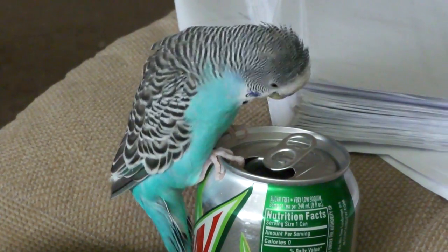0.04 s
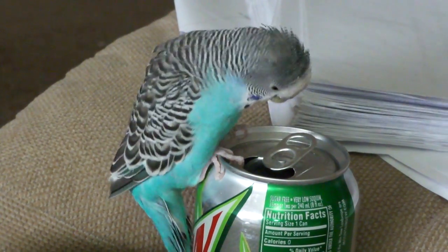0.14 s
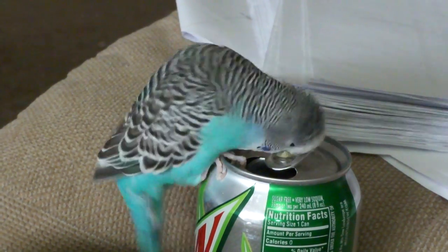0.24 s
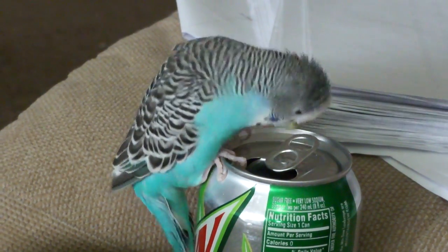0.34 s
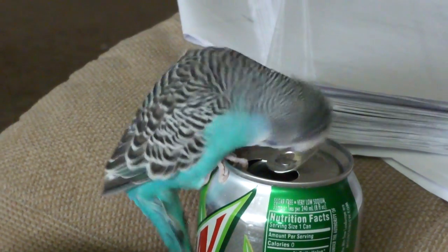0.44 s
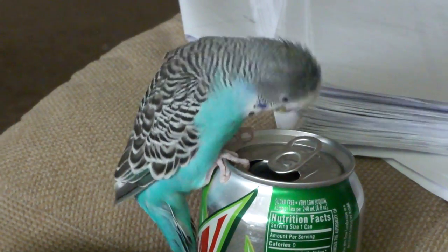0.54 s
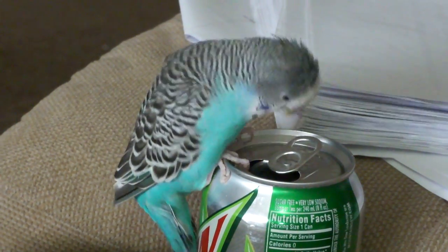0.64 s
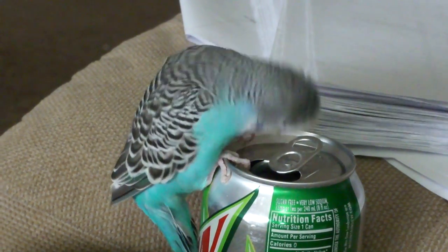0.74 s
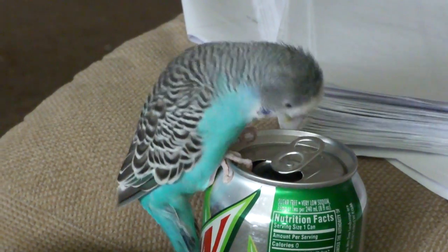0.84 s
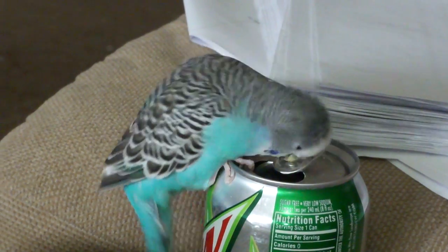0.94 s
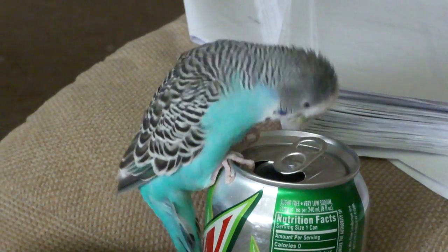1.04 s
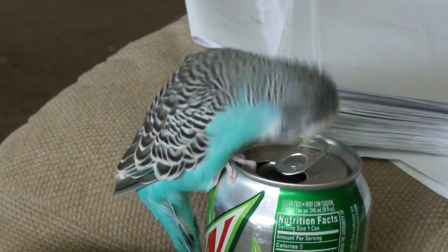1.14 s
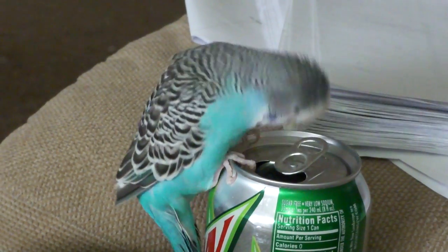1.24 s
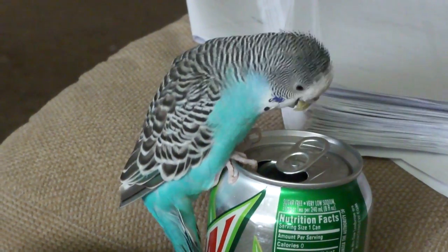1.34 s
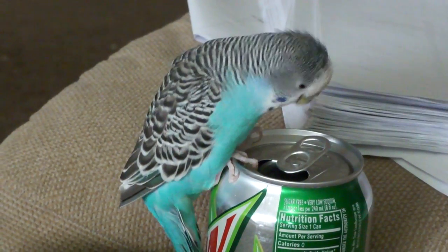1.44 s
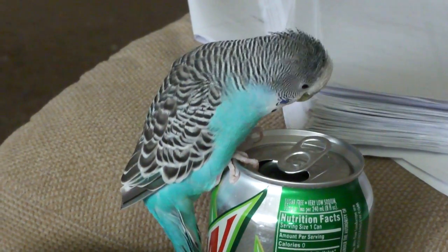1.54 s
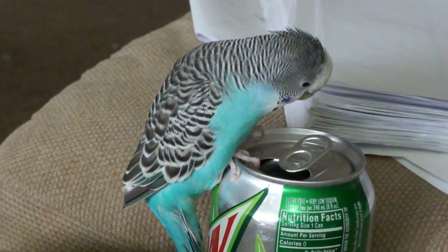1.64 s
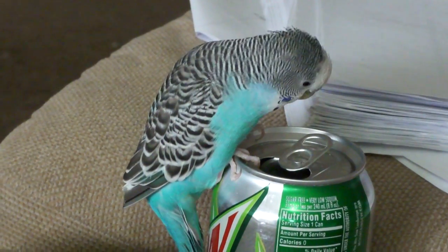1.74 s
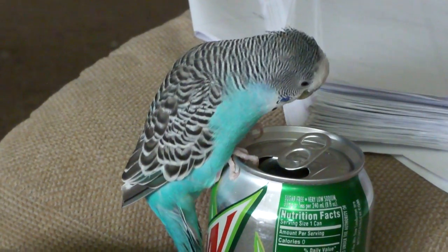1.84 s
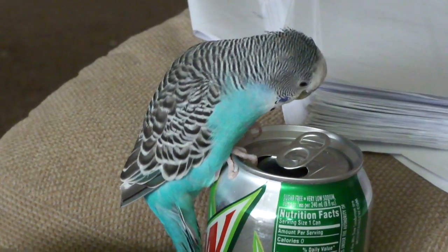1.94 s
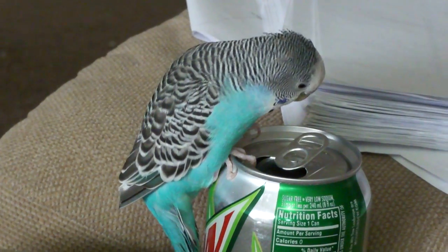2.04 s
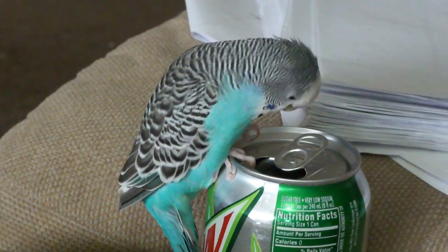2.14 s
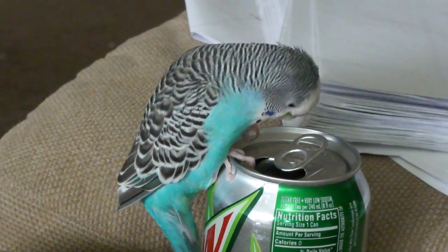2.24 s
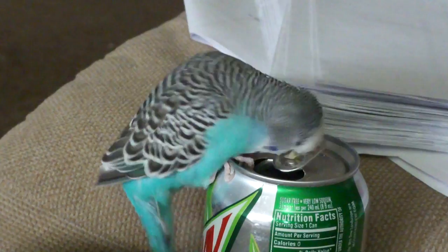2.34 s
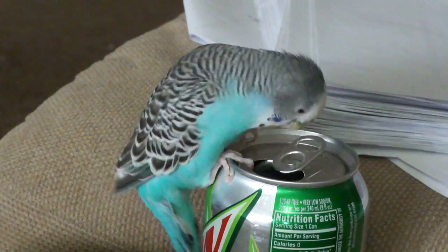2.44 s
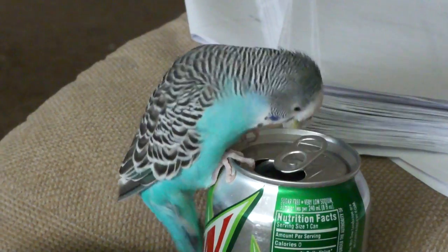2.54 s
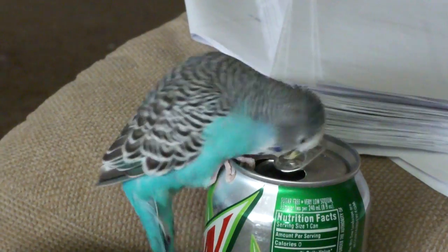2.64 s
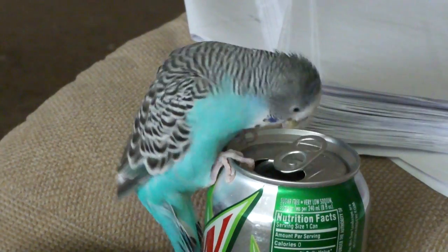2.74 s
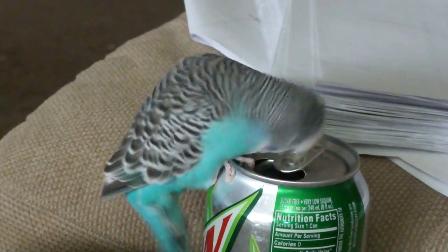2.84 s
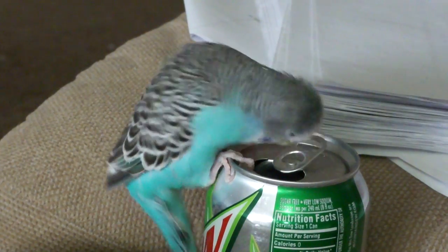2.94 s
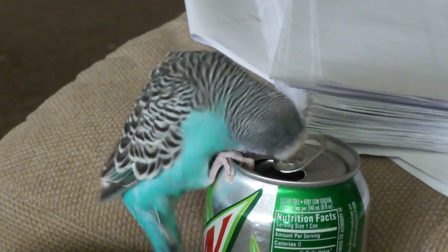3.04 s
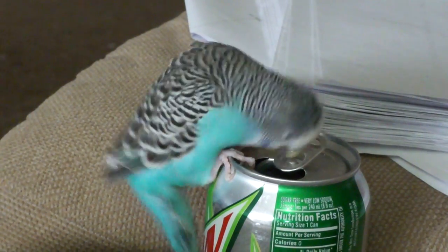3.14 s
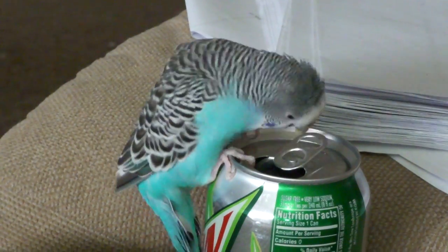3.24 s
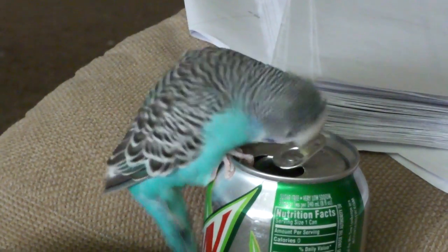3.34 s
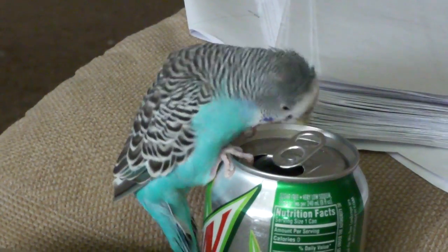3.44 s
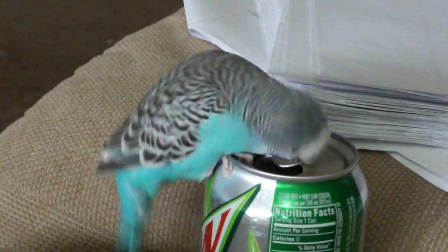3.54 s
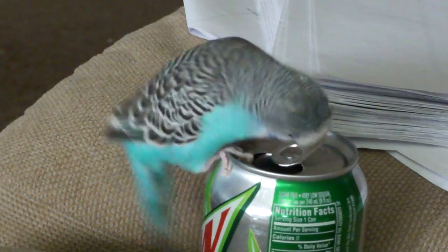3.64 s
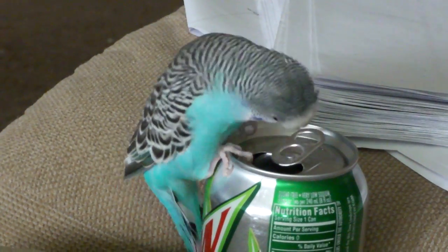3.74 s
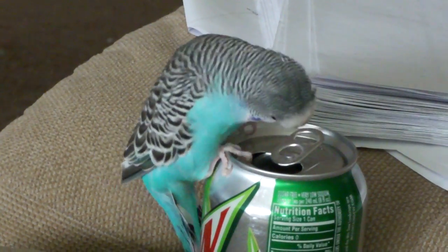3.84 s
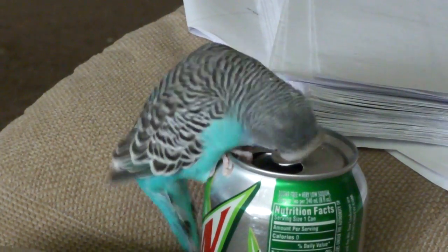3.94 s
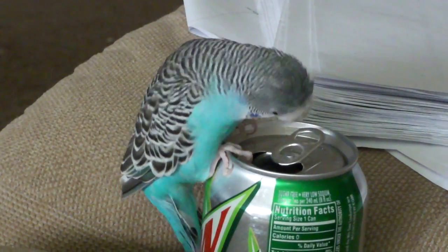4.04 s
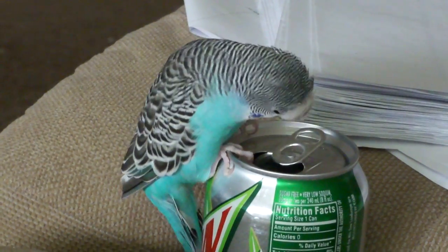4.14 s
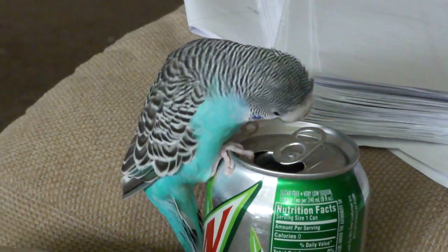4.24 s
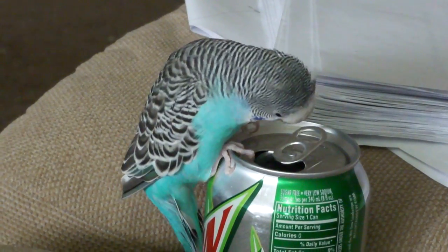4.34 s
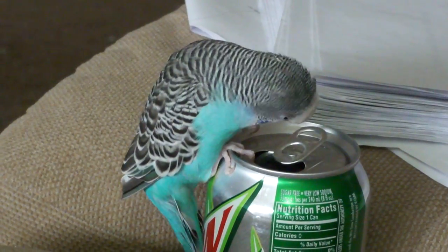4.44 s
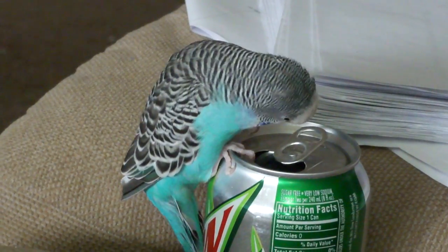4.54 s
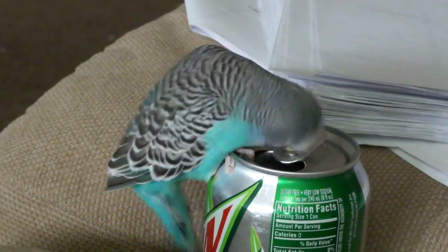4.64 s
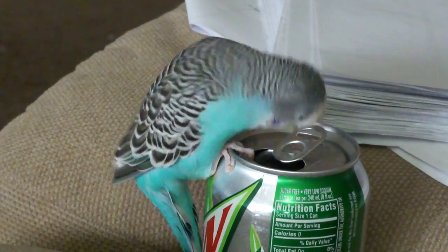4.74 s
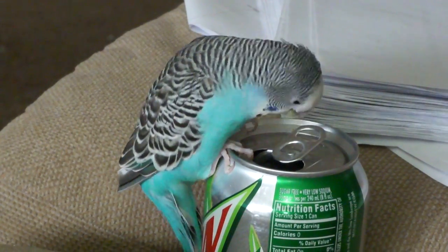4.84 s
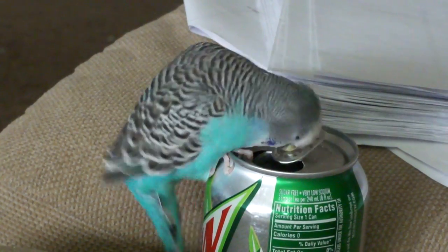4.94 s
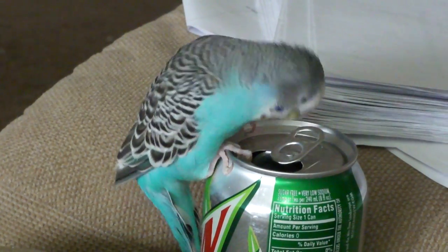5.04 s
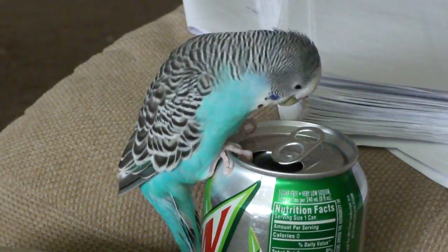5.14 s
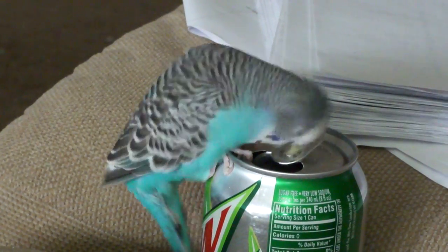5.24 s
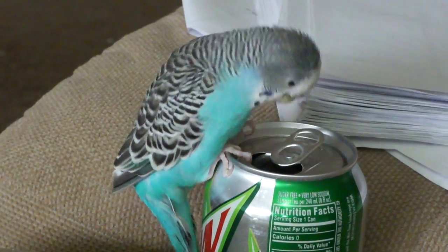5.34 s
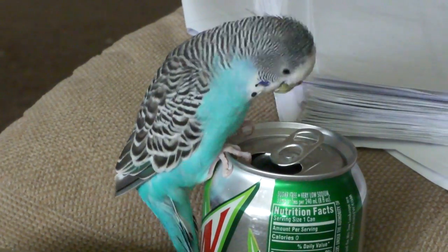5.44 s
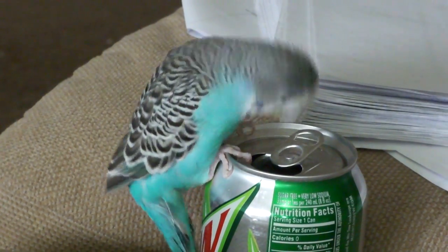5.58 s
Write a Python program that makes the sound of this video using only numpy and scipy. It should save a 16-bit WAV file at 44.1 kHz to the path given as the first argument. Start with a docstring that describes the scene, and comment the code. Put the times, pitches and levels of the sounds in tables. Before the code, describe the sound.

Bursts of tinny beak knocks on an empty drink can, jingling loose tab, a pause with one thin faint whistle, then more pecks.

```python
"""Under steady hiss and faint hum, the last ring of a peck gives way to a soft knock as a can rocks back.
A budgerigar on an empty aluminium can goes on pecking at the pull tab, close to a camera in a quiet room.
Each peck is an impact: broad modes crack, lid and thin wall ring, and random contacts make the tab chatter.
Force and spot set the mix; the tab slaps back, and the can rocks and settles with soft knocks.
Between two bouts comes one thin, faint whistle, a gliding tone, then a faint swell of treble noise."""
import sys
import numpy as np
from scipy import signal
from scipy.fft import rfft, irfft
from scipy.io import wavfile

SR = 44100
rng = np.random.default_rng(int(sys.argv[2]) if len(sys.argv) > 2 else 0)


def file_out(sig):
    """Save sig as 16-bit WAV at sys.argv[1]."""
    # one column per channel
    cols = np.atleast_2d(sig).T
    # limit, then scale
    lim = np.clip(cols, -1, 1)
    pcm = np.round(lim * 32767).astype(np.int16)
    wavfile.write(sys.argv[1], SR, pcm)


N = 247401
AGE = np.arange(SR // 2) / SR  # seconds since a blow

# Background spectrum. Each row: frequency in Hz, relative level in dB.
HISS_SPECTRUM = [(20, -28), (60, -22.5), (95, -21), (120, -8), (160, -9.5), (300, -3), (520, -0.5),
                 (800, -3.5), (2000, -7.5), (3500, -30.5), (6600, -13.5), (10000, -19.5), (15500, -32.5)]
# Pecks. Each row: start in seconds, force in dB, spot struck, pitch of the lid in Hz,
# level of the can rocking back in dB.
PECKS = [(-.084, -5, "lid", 350, -50.5), (.2624, 2.5, "lid", 343, -46.5), (.4976, -5.5, "rivet", 354, -64),
         (.7531, -3, "lid", 355.4, -67), (.9532, 0.8, "rivet", 344, -43), (1.229, -7.5, "rivet", 335, -72),
         (2.366, -0.3, "tab", 350.7, -47), (2.647, 1.3, "rivet", 354, -53.5),
         (2.8992, 0.4, "rivet", 353, -53), (3.075, -4, "lid", 347, -55), (3.3966, -9, "rivet", 356.5, -70),
         (3.5718, 0, "rim", 357.4, -63), (3.9986, -3, "shoulder", 338, -63), (4.6994, 2, "tab", 341, -64),
         (4.9788, 0, "tab", 339.5, -53.5), (5.302, .5, "lid", 352, -63), (5.5809, 4.5, "lid", 348, -60)]
# How each spot of the can's top answers a peck of force 0 dB. Each entry: favoured pitch of the wall in Hz,
# its boost in dB, then the levels in dB of crack, wall ring, lid, rim and chatter,
# chatter length in seconds, level of the tab's slap in dB.
SPOTS = {"lid": (1253, 7, -38, -36.5, -33, -41.5, -35.5, 0.0317, -42.5),
         "rivet": (1679.5, 6, -36.5, -36.5, -33.5, -44.5, -35.5, 0.0334, -42),
         "tab": (1690, 1.5, -38, -37.5, -33, -60, -33.5, 0.0332, -33.5),
         "rim": (1999, 15.5, -32.5, -36, -33, -29.5, -34, 0.04, -51),
         "shoulder": (2168, 12, -34, -36.5, -43.5, -54, -35.5, 0.03, -45)}
# Spectrum of the hard beak's first touch. Each row: frequency in Hz, relative level in dB.
BEAK_TICK_SPECTRUM = [(1000, -14.5), (3400, -4.5), (5000, -7.5), (7000, 3), (11000, -2.5), (14500, -21),
                      (15500, 11), (16500, -7)]
# The dent under the beak, gone in a few cycles. Each row: frequency in Hz, level in dB, t60 in seconds.
DENT_MODES = [(258, -14.5, 0.031), (487, -12, 0.078), (806, -8.5, 0.031), (1186, -0.5, 0.0099),
              (1764, 1, 0.018), (2170, 1.5, 0.0075), (2610, 4.5, 0.0055)]
# Ring of the can's wall. Each row: nominal frequency in Hz, mean level in dB before the spot's boost,
# t60 in seconds.
WALL_MODES = [(760, -3, .19), (815, -4, .07), (1052, -2, .23), (1140, -3, .11), (1215, -3, .18),
              (1281, 0, .12), (1318, -4, .22), (1665, -1, .18), (1725, -2, .1), (1843, -1, .18),
              (1990, -4, .12), (2155, -2, .24), (2200, -3, .17), (2364, -1, .17), (2434, -1, .17),
              (2574, -1, .16), (2690, -3, .12), (2808, 0, .15), (3230, -3, .16), (3430, -3, .14)]
# Spectrum of the wall's wash of close modes. Each row: frequency in Hz, relative level in dB.
WASH_SPECTRUM = [(40, -41), (120, -20), (200, 0), (480, 2), (660, -9.5), (820, -1.5), (960, -6),
                 (1220, -1.5), (1500, -6), (1730, 0.5), (2000, -2.5), (2500, -1), (4000, -12),
                 (9000, -21.5)]
# Ring of the tab. Each row: nominal frequency in Hz, mean level in dB, t60 in seconds.
TAB_MODES = [(5610, -8, .1), (6200, -13, .12), (6870, -4, .07), (6965, -2, .09), (7058, 0, .12),
             (7160, -3, .08), (7320, -5, .07), (7818, -6, .1), (8350, -10, .09), (8867, -8, .11),
             (10140, -10, .07)]
# Spectrum of the tab's chatter. Each row: frequency in Hz, relative level in dB.
CHATTER_SPECTRUM = [(300, -28), (1500, 2), (3400, -7.5), (5500, -3), (6300, -1.5), (7050, 13), (7700, 4),
                    (9000, 2.5), (11000, -4.5), (14500, -25), (15500, -5), (16500, -65.5)]
# Path of the whistle. Each row: time in seconds, pitch in Hz before its waver.
WHISTLE_PATH = [(1.772, 6516), (1.786, 6500), (1.86, 6579), (1.898, 6340), (1.985, 6660)]
# Light touches of the beak. Each row: start in seconds, dull tap in dB, bright tick in dB.
TOUCHES = [(3.722, -71, -52), (3.947, -60, -80), (4.3827, -55.5, -72)]
# The camera's response, with narrow notches in the treble. Each row: frequency in Hz, gain in dB.
CAMERA_RESPONSE = [(2550, -2), (2850, -9.5), (3010, -17.5), (3200, -6.5), (3500, -4), (3880, -12),
                   (4020, -22), (4200, -9), (4700, -12.5), (5000, -26), (5250, -8), (5600, -4.5),
                   (11100, -6.5), (11900, -23.5), (13600, -16.5), (14400, 0), (15400, -9)]

HISS_MID_DB, HISS_SIDE_GAIN = -56, 1.23
HUM_HZ, HUM_DB = 120, -79.5
# dB gained per dB of force: crack and lid grow slowly, the loose tab chatters louder and longer
# and slaps much harder
CRACK_GROWTH, LID_GROWTH, CHATTER_GROWTH, CHATTER_LENGTH_GROWTH, SLAP_GROWTH = 0.71, 0.76, 1.11, 0.67, 1.37
CONTACTS_PER_S, CONTACT_SCATTER_DB = 750, 4
TAP_TOP_HZ = 1900
# the tab springs back twice at even intervals, weaker the second time; its dull tap lies under its tick
SLAP_S, SECOND_SLAP_DB, SLAP_TAP_DB = 0.0102, -5, -7.5
# the can drops back on the cushion and settles once more, at these times after a peck
ROCK_S, SETTLE_S, SETTLE_DB = 0.084, 0.128, -11.5
ROOM_T60_S, ROOM_TREBLE_T60_S, ROOM_DB = 0.35, 0.25, -11
WHISTLE_DB = -64.5
RASP_START_S, RASP_END_S, RASP_HZ, RASP_PEAK_DB = 1.98, 2.25, 9000, -69
PORT_LAG_S = 6e-6  # later arrival of the metal's sound on the left
TOP_HZ = 16300


def undb(db):
    """Amplitude ratio: twenty decibels are a factor of ten."""
    return 10 ** (np.asarray(db) / 20)


def fade(t60):
    """Free exponential decay, falling 60 dB in t60 seconds."""
    return np.exp(-np.log(1000) * AGE / t60)


def level(x, db):
    """Root-mean-square scaling, taken over the first 25 ms of a blow."""
    return x * undb(db) / np.sqrt(np.mean(x[:SR // 40] ** 2))


def convolve(x, response):
    """Linear superposition: each sample of x launches the response; the length of x is kept."""
    return signal.fftconvolve(x, response)[:len(x)]


def colour(x, points, size=4096):
    """Minimum-phase filtering: the (Hz, dB) points fix a causal response through a folded cepstrum."""
    hz, db = np.transpose(points)
    grid = np.maximum(np.arange(size // 2 + 1) * SR / size, 1)
    curve_db = np.interp(np.log(grid), np.log(hz), db)
    cepstrum = irfft(np.log(undb(curve_db)))
    # fold negative time onto positive time
    cepstrum[1:size // 2] *= 2
    cepstrum[size // 2 + 1:] = 0
    return convolve(x, irfft(np.exp(rfft(cepstrum))))


def add(track, s, sound):
    """Superposition of a sound at time s, cut where it lies outside the track."""
    start = int(s * SR)
    part = sound[max(-start, 0):max(N - start, 0)]
    start = max(start, 0)
    track[start:start + len(part)] += part


def noise():
    """White noise, of equal power at all frequencies, as long as a blow."""
    return rng.standard_normal(len(AGE))


def hiss():
    """Stationary noise of room air and microphone; mid and side parts make left and right nearly unrelated."""
    mid, side = (colour(rng.standard_normal(N), HISS_SPECTRUM) for _ in range(2))
    stereo = mid + HISS_SIDE_GAIN * side * np.array([[1], [-1]])
    return stereo * undb(HISS_MID_DB) / np.std(mid)


def hum():
    """Pure tone: a faint mains hum somewhere in the room."""
    return np.sqrt(2) * undb(HUM_DB) * np.sin(2 * np.pi * HUM_HZ * np.arange(N) / SR)


def crack(grit_db=-7, rebound_s=0.002688, rebound_db=-5):
    """Impact and reflection: broad modes, a little grit, and the wave coming back from the can's base."""
    dent = np.zeros(len(AGE))
    for k, (hz, db, t60) in enumerate(DENT_MODES):
        dent += (-1) ** k * undb(db) * fade(t60) * np.sin(2 * np.pi * hz * AGE)
    lag = int(rebound_s * SR * rng.uniform(0.8, 1.2))
    returned = np.pad(dent, (lag, 0))[:len(AGE)]
    grit = colour(noise() * fade(0.015), WASH_SPECTRUM)
    return level(dent + undb(rebound_db) * returned, 0) + level(grit, grit_db)


def ring(modes, scatter_db=1.5, detune=0.0019):
    """Modal decay: scattered levels and random signs stand for where the metal is touched."""
    hz, db, t60 = np.transpose(modes)[:, :, None]
    size, drift, side = rng.standard_normal((3, len(modes), 1))
    swing = np.sin(2 * np.pi * hz * (1 + detune * drift) * AGE)
    return np.sum(np.sign(side) * undb(db + scatter_db * size) * fade(t60) * swing, axis=0)


def wall(favoured_hz, boost_db, octaves=0.11, wash_db=-3.5, wash_t60=0.28, rise_s=0.0021):
    """Selective excitation: the spot favours clear modes near one pitch, over a wash of close ones."""
    modes = []
    for hz, db, t60 in WALL_MODES:
        nearness = np.exp(-(np.log2(hz / favoured_hz) / octaves) ** 2)
        modes.append((hz, db + boost_db * nearness, t60))
    wash = level(colour(noise() * fade(wash_t60), WASH_SPECTRUM), wash_db)
    return (level(ring(modes, scatter_db=2.0), 0) + wash) * (1 - np.exp(-AGE / rise_s))


def contacts(length_s):
    """Random impact train: tiny uneven hits of the loose tab thin in strength to 1/e at length_s."""
    hits = rng.random(len(AGE)) < CONTACTS_PER_S / SR
    sizes = undb(CONTACT_SCATTER_DB * np.clip(noise(), -1.5, 1.5)) * np.sign(noise())
    hits[0], sizes[0] = True, 1  # always one full hit at the start
    return hits * sizes * np.exp(-(AGE / length_s) ** 2)


def tab(push, ring_db=-2.5, sheet_db=-3, sheet_t60=0.11):
    """Impulse response: each contact ticks, rings the tab and shivers through the thin sheet around it."""
    shiver = level(noise() * fade(sheet_t60), sheet_db)
    tick = level(noise() * fade(0.0075), 0)
    sheet = level(colour(shiver + tick, CHATTER_SPECTRUM), 0)
    return convolve(push, sheet + level(ring(TAB_MODES), ring_db))


def snap(dull_db, bright_db):
    """Single contact of beak or tab: a low-passed dull tap and a bright tick."""
    soft = signal.butter(4, TAP_TOP_HZ, fs=SR, output="sos")
    tap = signal.sosfilt(soft, crack(grit_db=5))
    tick = tab(contacts(0.002), ring_db=-12, sheet_db=0, sheet_t60=0.096)
    return level(tap, dull_db) + level(tick, bright_db)


def boom(hz, t60, rise_s):
    """Build-up and decay of a low mode, with an exponential rise."""
    return (1 - np.exp(-AGE / rise_s)) * fade(t60) * np.sin(2 * np.pi * hz * AGE)


def pecks(tick_db=-4.8):
    """Forced, then free vibration: the beak strikes and lets go, and the tab slaps back; metal and boom."""
    metal, low = np.zeros((2, N))
    for s, force, spot, lid_hz, _ in PECKS:
        favoured_hz, boost, blow, side, lid, rim, chatter, length_s, slap = SPOTS[spot]
        chatter_db = chatter + CHATTER_GROWTH * force
        add(metal, s, level(colour(noise() * fade(0.043), BEAK_TICK_SPECTRUM), chatter_db + tick_db))
        add(metal, s, level(crack(), blow + CRACK_GROWTH * force))
        add(metal, s, level(wall(favoured_hz, boost), side + force))
        push = contacts(length_s * undb(CHATTER_LENGTH_GROWTH * force))
        add(metal, s, level(tab(push), chatter_db))
        for bounce in range(2):
            db = slap + SLAP_GROWTH * force + bounce * SECOND_SLAP_DB
            add(metal, s + (bounce + 1) * SLAP_S, snap(db + SLAP_TAP_DB, db))
        # the lid is damped while the beak presses on it; a little rings on, higher, once it is free
        pressed = boom(lid_hz, t60=0.083, rise_s=0.02)
        freed = boom(368, t60=0.29, rise_s=0.023)
        add(low, s, level(pressed + undb(-25) * freed, lid + LID_GROWTH * force))
        edge = boom(460, t60=0.058, rise_s=0.0029) + undb(-5.0) * boom(486, t60=0.061, rise_s=0.0043)
        add(low, s, level(edge, rim + force))
    return metal, low


def rocking(wall_db=-6, chatter_db=-7.0, knock_db=-9, tick_db=-9):
    """Secondary impacts: the can drops back on the cushion and settles, with knock, boom and jingle."""
    metal, low = np.zeros((2, N))
    for peck_s, *_, rock_db in PECKS:
        for s, db in (peck_s + ROCK_S, rock_db), (peck_s + SETTLE_S, rock_db + SETTLE_DB):
            add(low, s, level(boom(370.6, t60=0.092, rise_s=0.021), db))
            add(metal, s, snap(db + knock_db, db + tick_db))
            add(metal, s, level(wall(favoured_hz=1240, boost_db=2), db + wall_db))
            add(metal, s, level(tab(contacts(0.023)), db + chatter_db))
    return metal, low


def room(x, split_hz=3500):
    """Reverberation of a small furnished room: a diffuse tail, unlike on each side, whose treble dies first."""
    soft = signal.butter(2, split_hz, fs=SR, output="sos")
    sides = []
    for _ in range(2):
        air = noise()
        lows = signal.sosfilt(soft, air)
        tail = lows * fade(ROOM_T60_S) + (air - lows) * fade(ROOM_TREBLE_T60_S)
        tail *= 1 - np.exp(-AGE / 0.0024)
        sides.append(convolve(x, tail / np.linalg.norm(tail)))
    return np.array(sides)


def whistle(overtone_db=-17):
    """Frequency modulation: a thin gliding tone and its octave, roughened by a random waver of pitch."""
    t = np.arange(N) / SR
    s, hz = np.transpose(WHISTLE_PATH)
    waver = 0.009 * signal.resample(rng.standard_normal(N // 40), N)
    phase = 2 * np.pi * np.cumsum(np.interp(t, s, hz) * (1 + waver)) / SR
    tone = np.sin(phase) + undb(overtone_db) * np.sin(2 * phase)
    gate = np.clip(np.minimum(t - s[0], s[-1] - t) / 0.0096 + 1, 0, 1)  # 9.6 ms ramps
    return np.sqrt(2) * gate * undb(WHISTLE_DB) * tone


def rasp():
    """Band-passed noise: a faint, narrow band of treble swells and fades as the whistle ends."""
    sos = signal.butter(2, [RASP_HZ * 0.88, RASP_HZ * 1.12], "band", fs=SR, output="sos")
    band = signal.sosfilt(sos, rng.standard_normal(N))
    progress = np.clip((np.arange(N) / SR - RASP_START_S) / (RASP_END_S - RASP_START_S), 0, 1)
    swell = 2 * np.sqrt(progress * (1 - progress))
    return band / np.std(band) * undb(RASP_PEAK_DB) * swell


def touches():
    """Light impact: between pecks the beak now and then just touches the metal."""
    out = np.zeros(N)
    for s, dull_db, bright_db in TOUCHES:
        add(out, s, snap(dull_db, bright_db))
    return out


def scene():
    """Direct and reverberant sound of bird and can, a little right of the camera's axis, over the background."""
    metal, low = np.add(pecks(), rocking())
    metal = metal + touches() + whistle() + rasp()
    # the deepest bass, below about 110 Hz, is cut away
    highpass = signal.butter(2, 110, "high", fs=SR, output="sos")
    metal, low = signal.sosfilt(highpass, [metal, low])
    # a shifted sinc delays by a fraction of a sample
    taps = np.arange(-8, 9)
    left = np.convolve(metal, np.sinc(taps - PORT_LAG_S * SR), "same")
    direct = np.array([undb(-0.66) * left, undb(0.16) * metal]) + low
    reverberant = undb(ROOM_DB) * room(metal + undb(-12) * low)
    return direct + reverberant + hiss() + hum()


def record(dry):
    """Linear filtering: the camera colours the treble and a steep low-pass cuts the top."""
    coloured = np.array([colour(channel, CAMERA_RESPONSE) for channel in dry])
    return signal.sosfilt(signal.ellip(8, 0.2, 70, TOP_HZ, fs=SR, output="sos"), coloured)


dry = scene()
out = record(dry)
file_out(out)
```